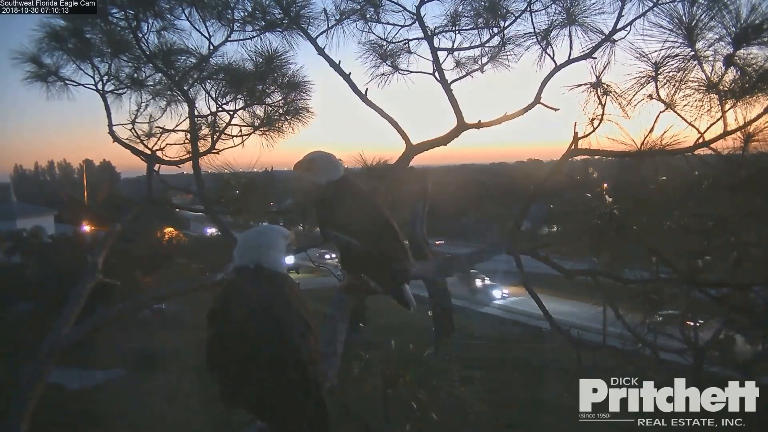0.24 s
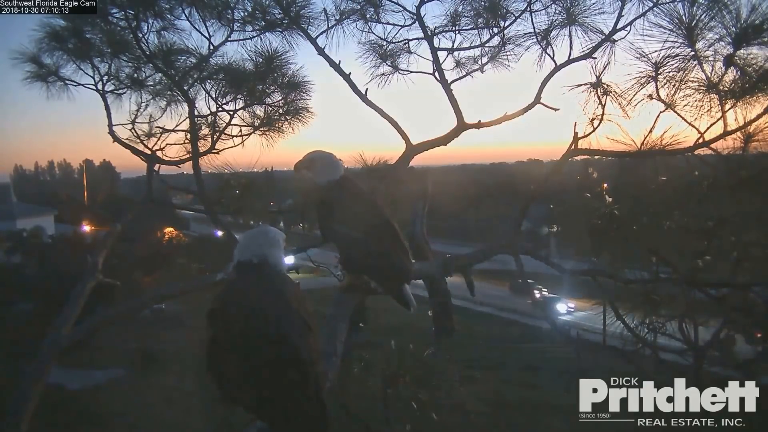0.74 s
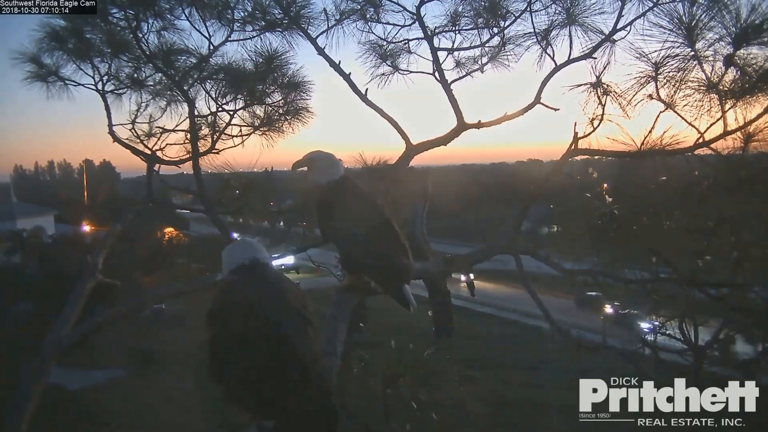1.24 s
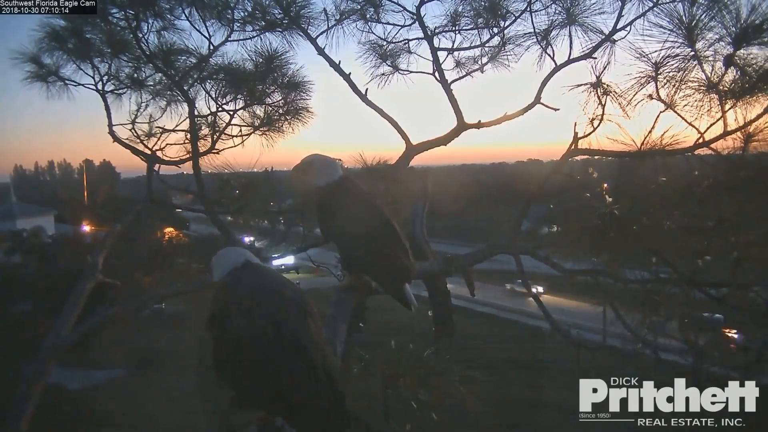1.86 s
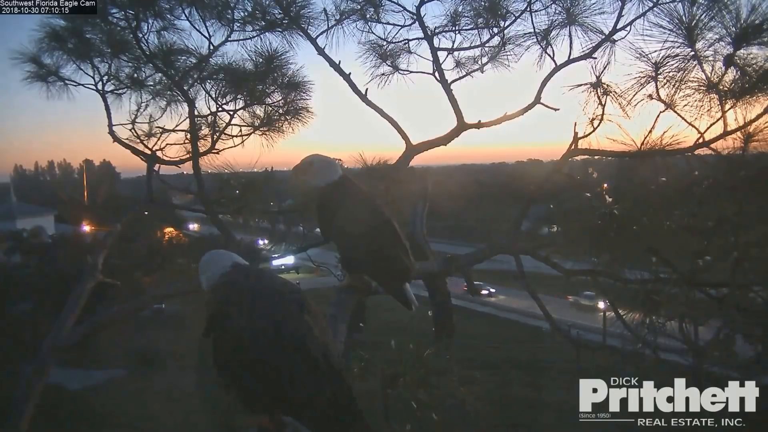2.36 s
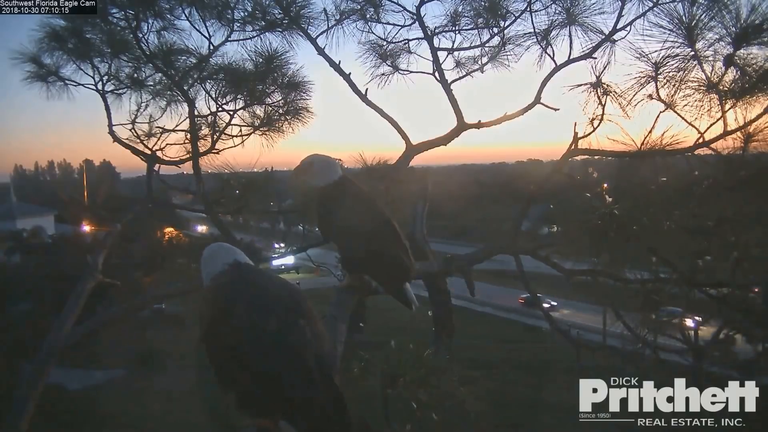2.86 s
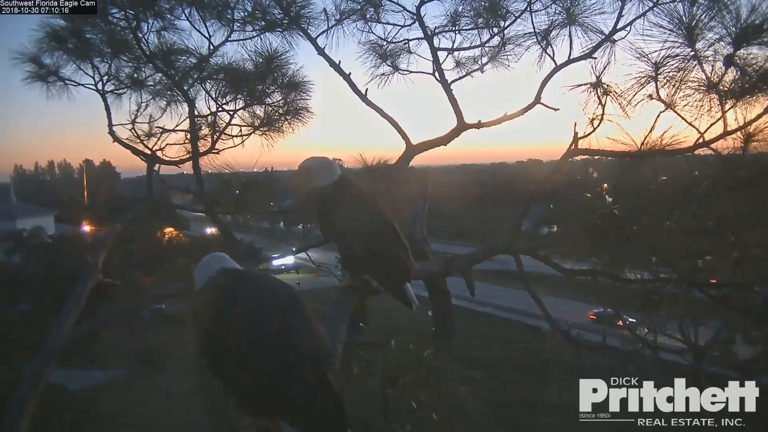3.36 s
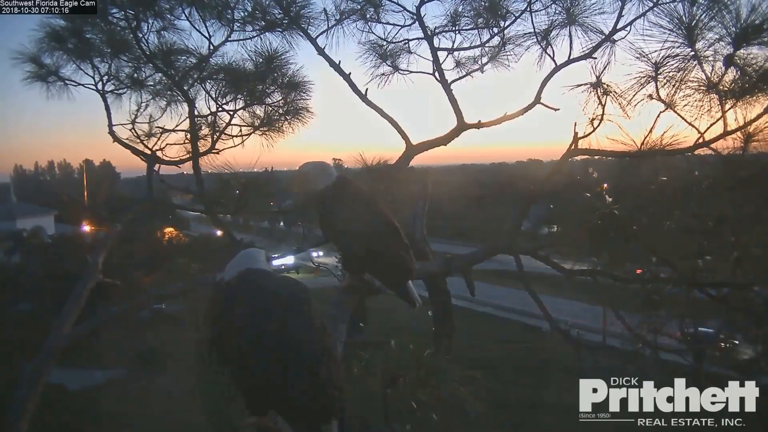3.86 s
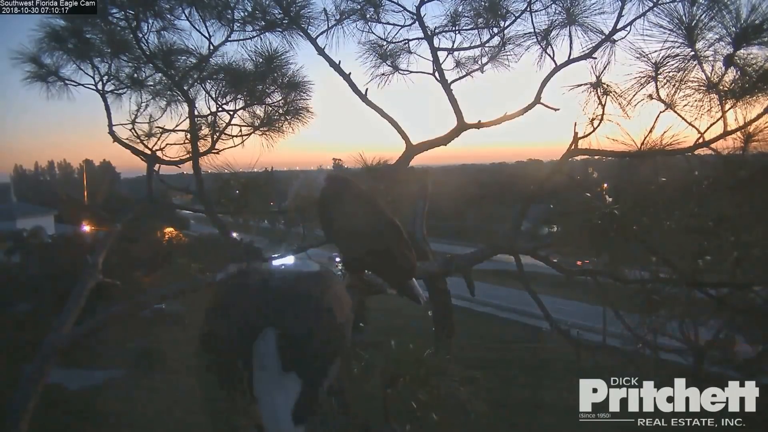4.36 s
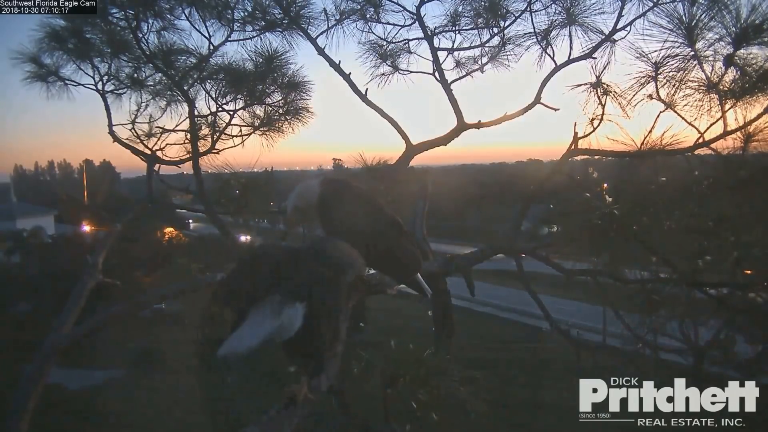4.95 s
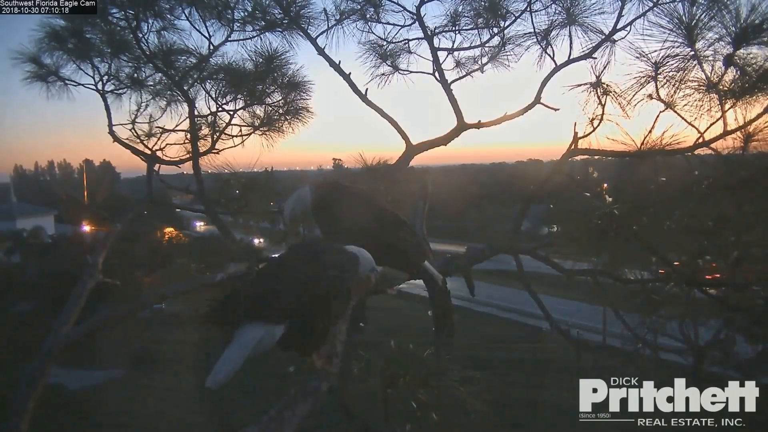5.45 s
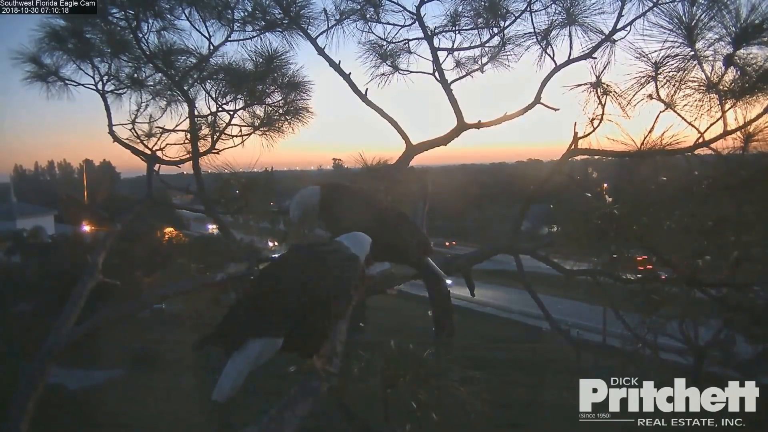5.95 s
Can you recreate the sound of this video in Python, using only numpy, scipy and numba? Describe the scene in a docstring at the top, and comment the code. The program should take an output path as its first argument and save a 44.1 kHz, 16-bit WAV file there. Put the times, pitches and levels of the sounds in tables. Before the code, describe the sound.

Close, shrill bald eagle calls caught by a small, overloaded outdoor microphone. Long high whistles scoop upward, climb slowly and drop off, sometimes cracking hoarsely; another bird adds brief, thin, fluttering chitter notes. Behind them lies unbroken soft traffic hiss with a barely audible hum, pushed down during each loud cry and swelling back afterwards. There is only a faint short echo from trunk and branches, and the treble is dull.

```python
"""The falling tail of an earlier whistle opens over the hiss and faint hum of a distant road; two bald eagles call from a pine.
One gives short, wavering chitter notes: single gliding tones roughened by random flutter.
The other gives three long rising whistles and begins a fourth: five partials, the second strongest.
A nest camera's 16 kHz sound chip limits fast, so the hiss ducks under loud calls, and clips what is left."""
import sys
import numpy as np
from scipy import signal
from scipy.fft import rfft, irfft
from scipy.io import wavfile
from scipy.ndimage import map_coordinates
from numba import njit

SR = 44100
rng = np.random.default_rng(int(sys.argv[2]) if len(sys.argv) > 2 else 0)


def generate_wav(signal):
    """Clip the signal to [-1, 1] and save it as 16-bit WAV at the path in sys.argv[1]."""
    frames = np.transpose(np.atleast_2d(signal))
    scaled = np.clip(frames, -1, 1) * 32767
    pcm = np.round(scaled).astype(np.int16)
    wavfile.write(sys.argv[1], SR, pcm)


N = 273861  # length in samples

# chitter notes; the first two rows are two partials, an octave apart, of a whistle's falling tail:
# [start_s, length_s, middle_pitch_hz, glide_start_to_end_hz, arch_hz, level_db, roughness_0_to_1]
CHITTER_NOTES = [ (-.012, 0.039, 3980, -300, 21, -19, 0.25), (-.012, 0.041, 1988, -150, 11, -21, 0),
                 (.016, 0.037, 2530, -260, -2, -30.5, 0.25), (0.374, 0.096, 3364, -380, -61, -29, 0.32),
                 (0.451, 0.091, 3460, -68, 213, -29.5, 0.22), (0.571, 0.045, 2353, 64, 29, -32.5, 0.17),
                 (.602, 0.057, 3360, -20.5, 128, -33, 0.3), (0.763, 0.028, 3290, 40, 60, -33, 0.4),
                 (2.254, 0.03, 3420, 49, 52, -33, .4), (2.274, 0.078, 3520, -150, 74, -31.5, 0.47),
                 (2.395, 0.069, 3530, -100, 186, -31.5, 0.3), (2.551, 0.027, 3390, 52, 59, -34, 0.4),
                 (3.166, 0.11, 3610, -150, 221.5, -27.5, 0.4), (3.259, 0.09, 3524, -35, 188.5, -28.5, 0.34),
                 (3.912, .028, 3510, 122, 3, -23, 0.3), (3.927, 0.082, 3650, -150, 42, -24.5, 0.29),
                 (3.991, 0.079, 3580, -110, 85.5, -26, .3), (5.62, 0.032, 2990, 156, -7, -26, 0.25),
                 (5.641, 0.04, 3240, 30, 81, -43, 0.5), (6.109, 0.025, 3750, -3, 30, -30, .4),
                 (6.125, 0.057, 3570, -190, 55, -27.5, 0.1), (6.155, 0.048, 3340, -130, 0, -36, .45), ]
# spectrum of the road's hiss as the camera housing colours it: [frequency_hz, relative_level_db_per_hz]
HISS_SPECTRUM = [(30, -33.5), (200, -14), (480, -9), (760, -1.5), (1080, -8), (1400, 3.5), (1650, 3),
                 (2080, -3.5), (2700, 1.5), (3200, -6), (3800, -11.5), (4500, -22.5), (6000, -28.5),
                 (7600, -57)]
# faint hum tones: [pitch_hz, level_db]
HUM_TONES = [(97, -70), (247, -67), (409, -62.5)]
# long whistles, pitched by their first partial:
# [start_s, length_s, climb_from_hz, climb_to_hz, scoop_time_constant_s, level_db, overtones_db]
WHISTLES = [ (1.033, 0.44, 1320, 1557, .022, -17.5, -4), (2.887, 0.56, 1319, 1553, 0.029, -18, -0.5),
            (4.037, .667, 1379, 1597, 0.01, -18.5, -3), (6.188, .5, 1418, 1550, 0.0088, -29, 1), ]
# moments when a whistle turns hoarse: [centre_s, half_length_s, strong_partial_loss_db]
HOARSE_MOMENTS = [ (1.111, 0.056, 6.5), (1.188, 0.02, 9.5), (1.365, 0.036, 7.5), (3.194, .036, 8.5),
                  (3.305, .05, 6.5), (4.328, 0.044, 4), (4.492, 0.14, 4.5), (4.633, 0.027, 14.5), ]

HISS_DB = -37.5
NOTE_ATTACK_S, NOTE_RELEASE_S = 0.014, 0.022
WHISTLE_RELEASE_S = 0.0099
# the syrinx is slack as a whistle starts and ends: the pitch lies lower, the tone is softer and purer
SCOOP_HZ, DROOP_HZ, DROOP_S = 185.8, 286, 0.029
SCOOP_DB, DROOP_DB, SLACK_OVERTONES_DB = -19, -10, -20
# first and third partials against the second, which carries the call; the first grows from start to end
FIRST_DB, FIRST_GROWTH_DB, THIRD_DB = -19, 7.5, -13.5
# dB added to each partial, to the pitch jitter and to the level shimmer per dB of hoarse loss
HOARSE_FIRST, HOARSE_THIRD, HOARSE_JITTER, HOARSE_SHIMMER = 1.28, 0.65, 0.74, 0.094
CHIP_SR, TOP_HZ = 16000, 7380  # the chip's sample rate, and the top of the audible band, both Hz


def undb(db):
    """Decibels to gain."""
    return 10 ** (np.asarray(db) / 20)


def waver(rate_hz, size):
    """Smooth random drift with a spread of about 1, moving mostly below rate_hz."""
    count = max(size, SR)
    hz = np.fft.rfftfreq(count, 1 / SR)
    spectrum = rfft(rng.standard_normal(count))
    drift = irfft(spectrum / (1 + (hz / rate_hz) ** 4), count)
    return drift[:size] / drift.std()


def span(start_s, length_s):
    """The sample positions of a call, and the time since its start."""
    first = max(int(start_s * SR), 0)
    last = min(int((start_s + length_s) * SR), N)
    at = np.arange(first, last)
    return at, at / SR - start_s


def fade(size, edge_s=0.0011):
    """Soft start and end of a call."""
    i = np.arange(size)
    return np.clip(np.minimum(i, size - 1 - i) / (edge_s * SR), 0, 1)


def chitter(start_s, length_s, middle_hz, glide_hz, arch_hz, level_db, rough,
            jitter=0.005, jitter_hz=260, rough_hz=240):
    """A short, strained tone on an arch of pitch; where rough, it flutters and now and then cracks."""
    at, t = span(start_s, length_s)
    size = len(at)
    along = t / length_s - 0.5
    hz = middle_hz + glide_hz * along - arch_hz * (2 * along) ** 2
    phase = 2 * np.pi * np.cumsum(hz * (1 + jitter * waver(jitter_hz, size))) / SR

    attack = np.minimum(t / NOTE_ATTACK_S, 1) ** 2
    release = np.minimum((length_s - t) / NOTE_RELEASE_S, 1) ** 2

    # an unsteady share of the vibration sometimes cancels the steady one: a brief gap and a slip in pitch
    flutter = 1 + rough * (waver(rough_hz, size) + 1j * waver(rough_hz, size))
    tone = np.imag(flutter * np.exp(1j * phase))
    out = np.zeros(N)
    out[at] = np.sqrt(2) * tone * undb(level_db) * attack * release * fade(size)
    return out


def branches(x, wet_db=-27, t60_s=0.62):
    """Trunk and branches scatter a short, faint echo, here a decaying burst of noise."""
    t = np.arange(SR // 2) / SR
    echo = rng.standard_normal(len(t)) * undb(-60 * t / t60_s)
    echo = echo / np.linalg.norm(echo)
    return x + undb(wet_db) * signal.fftconvolve(x, echo)[:N]


def road():
    """Steady tyre hiss, as noise shaped by a spectrum, with faint hum tones under it."""
    table_hz, table_db = np.transpose(HISS_SPECTRUM)
    bins_hz = np.maximum(np.fft.rfftfreq(N, 1 / SR), 1)
    colour_db = np.interp(np.log(bins_hz), np.log(table_hz), table_db)
    hiss = irfft(rfft(rng.standard_normal(N)) * undb(colour_db), N)
    hiss = undb(HISS_DB) * hiss / hiss.std()

    t = np.arange(N) / SR
    hum = np.zeros(N)
    for pitch_hz, level_db in HUM_TONES:
        phase = 2 * np.pi * pitch_hz * t + waver(6, N)
        hum += undb(level_db) * np.sqrt(2) * np.sin(phase)
    return hiss + hum


def whistle(start_s, length_s, from_hz, to_hz, scoop_s, level_db, overtones_db,
            jitter=0.0018, jitter_hz=180, shimmer_db=1.3, fourth_db=-20, fifth_db=-29,
            drift=0.002, wander_db=1.5):
    """A nearly pure syrinx tone that scoops up, climbs and droops; the throat favours its second partial."""
    at, t = span(start_s, length_s)
    size = len(at)
    along = t / length_s
    scoop = np.exp(-t / scoop_s)
    droop = np.exp(-((length_s - t) / DROOP_S) ** 2)
    hoarse = np.zeros(size)  # loss in dB
    for centre_s, half_s, loss_db in HOARSE_MOMENTS:
        hoarse += loss_db * np.exp(-((at / SR - centre_s) / half_s) ** 2)

    hz = from_hz + (to_hz - from_hz) * along - SCOOP_HZ * scoop - DROOP_HZ * droop
    hoarse_jitter = jitter * undb(HOARSE_JITTER * hoarse)
    unsteady = drift * waver(14, size) + hoarse_jitter * waver(jitter_hz, size)
    phase = 2 * np.pi * np.cumsum(hz * (1 + unsteady)) / SR

    colour_db = overtones_db + SLACK_OVERTONES_DB * (scoop + droop) + wander_db * waver(23, size)
    first = undb(FIRST_DB + FIRST_GROWTH_DB * along + HOARSE_FIRST * hoarse + colour_db)
    third = undb(THIRD_DB + HOARSE_THIRD * hoarse + colour_db)
    fourth, fifth = undb(fourth_db + colour_db), undb(fifth_db + colour_db)
    # the odd partials alternate in sign, which keeps the strong partial's crests even
    gains = [-first, 1, third, fourth, -fifth]
    tone = sum(gain * np.sin((k + 1) * phase) for k, gain in enumerate(gains))

    db = level_db + SCOOP_DB * scoop + DROOP_DB * droop - hoarse
    shimmer = (shimmer_db + HOARSE_SHIMMER * hoarse) * waver(98, size)
    release = np.minimum((length_s - t) / WHISTLE_RELEASE_S, 1)
    out = np.zeros(N)
    out[at] = np.sqrt(2) * tone * undb(db + shimmer) * release * fade(size)
    return out


@njit
def follow(x, attack, release):
    """Envelope that rises quickly to the peaks and sinks slowly."""
    out, level = np.empty(len(x)), 0.
    for i in range(len(x)):
        size = abs(x[i])
        level += (size - level) * (attack if size > level else release)
        out[i] = level
    return out


def limiter(x, ceiling_db=-28.0, attack_s=0.0021, release_s=0.037):
    """The gain that turns birds and road down while a call is loud and lets the hiss back just after it."""
    attack = 1 - np.exp(-1 / (attack_s * SR))
    release = 1 - np.exp(-1 / (release_s * SR))
    envelope = follow(x, attack, release)
    return np.minimum(1, undb(ceiling_db) / (envelope + 1e-9))


def overload(x, gain, clip_db=-33.5, knee=12, bend=9.4):
    """Clips the crests, lopsidedly while the limiter works: octaves, and low beat tones between pitches."""
    clipped = x / (1 + np.abs(x / undb(clip_db)) ** knee) ** (1 / knee)
    return clipped - bend * (1 - gain) * clipped ** 2


def circuit_noise(db=-65, corner_hz=260):
    """Faint, dull noise of the electronics, which the limiter does not duck."""
    lowpass = signal.butter(1, corner_hz, fs=SR, output="sos")
    noise = signal.sosfilt(lowpass, rng.standard_normal(N))
    return undb(db) * noise / noise.std()


def chip(x, corner_hz=9200):
    """Samples behind a gentle filter: overtones above half the chip's rate fold back as faint mirrored lines."""
    soft = signal.sosfilt(signal.butter(4, corner_hz, fs=SR, output="sos"), x)
    places = np.arange(N * CHIP_SR // SR) * SR / CHIP_SR
    samples = map_coordinates(soft, [places], order=3)
    return signal.resample(samples, N)


def scene():
    """Both birds, with their echo, and the road reach one microphone."""
    chitters = sum(chitter(*row) for row in CHITTER_NOTES)
    whistles = sum(whistle(*row) for row in WHISTLES)
    sound = branches(chitters + whistles) + road()
    return np.array([sound, sound])


def record(dry):
    """The camera limits, clips and samples the sound, and the treble ends steeply; both channels are alike."""
    gain = limiter(dry[0])
    driven = overload(dry[0] * gain, gain)
    sampled = chip(driven + circuit_noise())
    sound = signal.fftconvolve(sampled, signal.firwin(201, TOP_HZ, fs=SR), "same")
    return np.array([sound, sound])


dry = scene()
out = record(dry)
generate_wav(out)
```